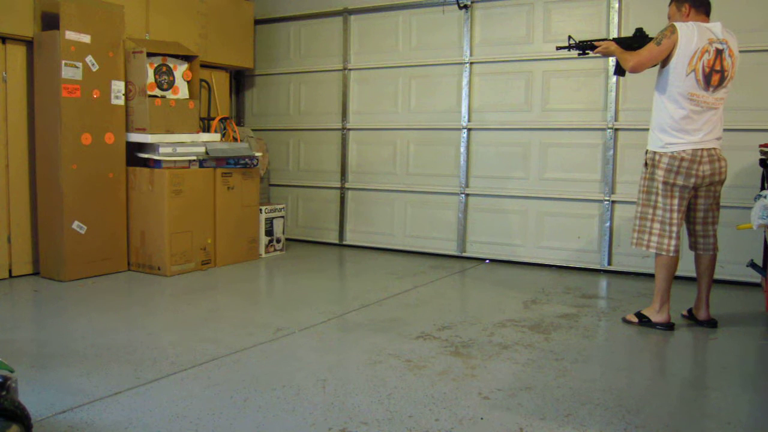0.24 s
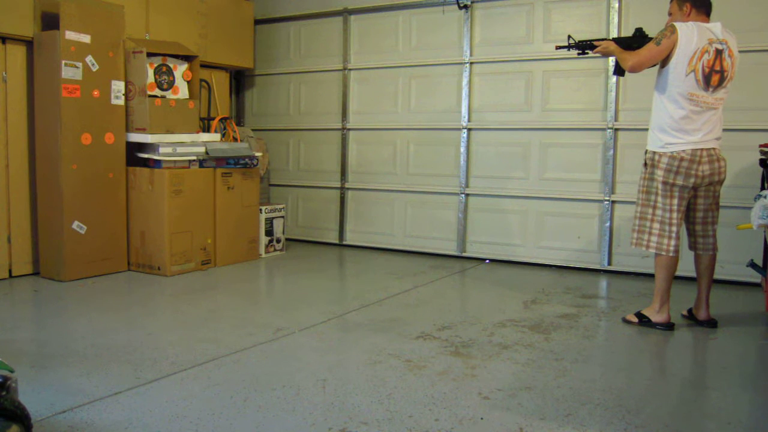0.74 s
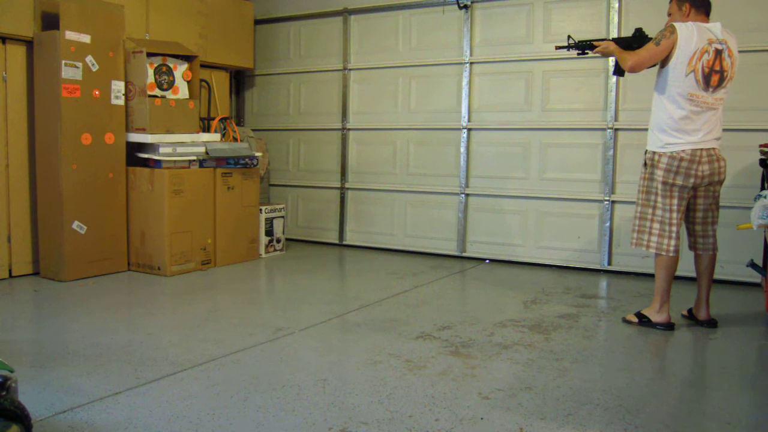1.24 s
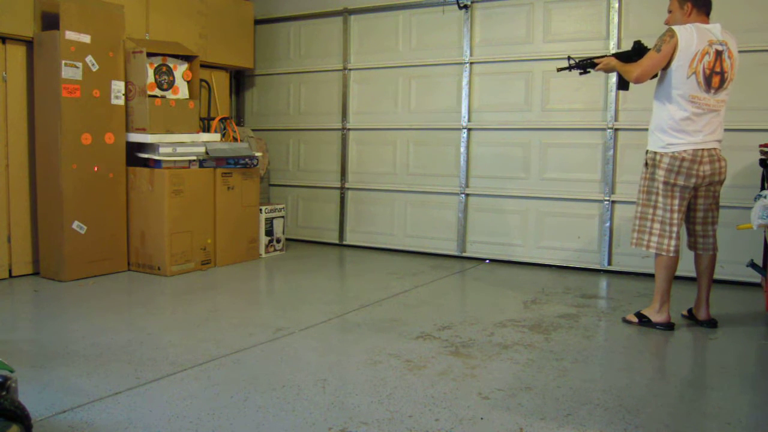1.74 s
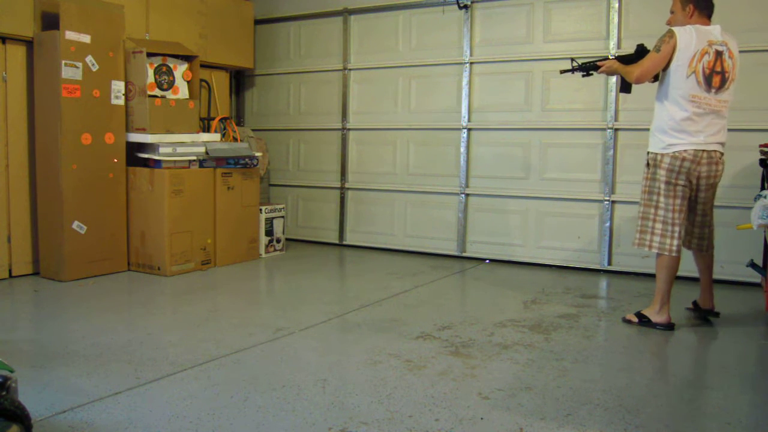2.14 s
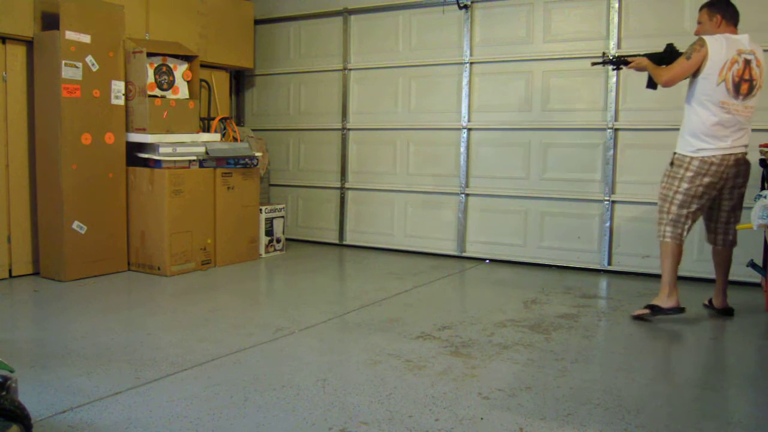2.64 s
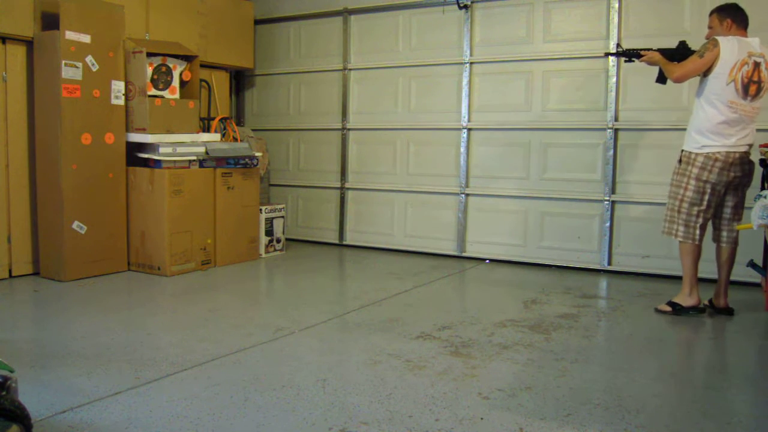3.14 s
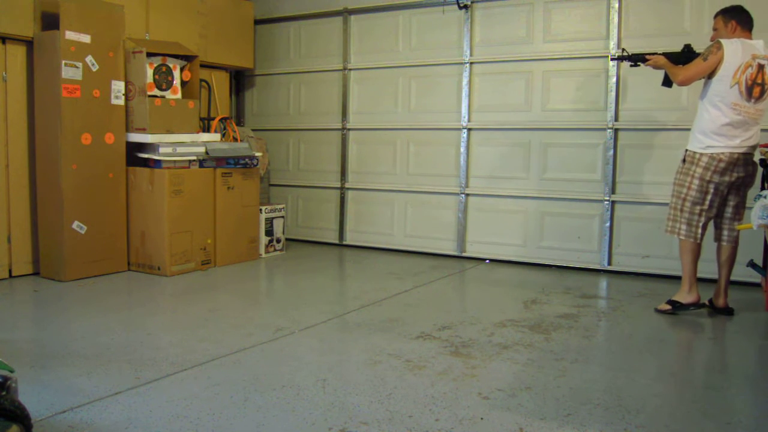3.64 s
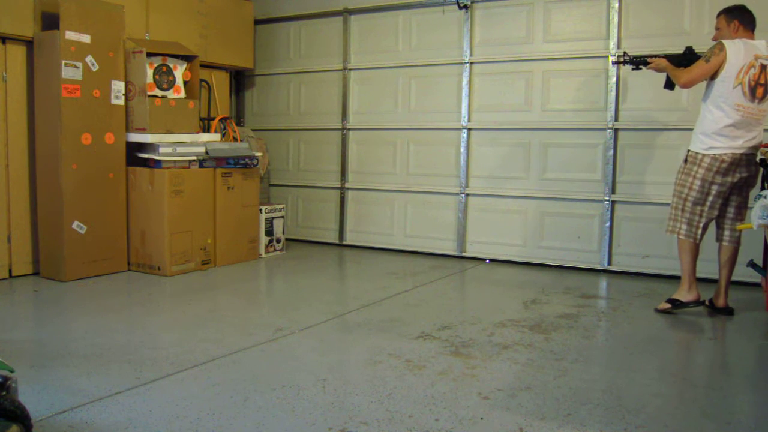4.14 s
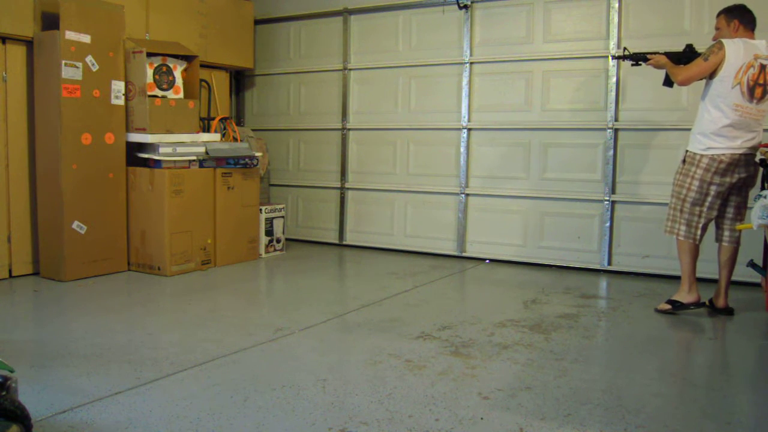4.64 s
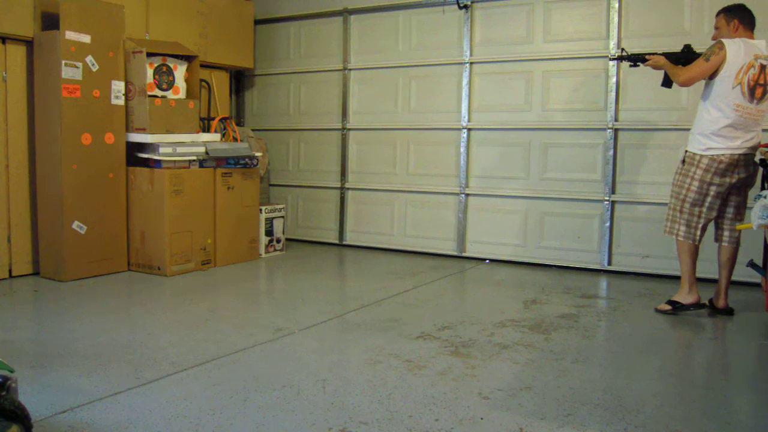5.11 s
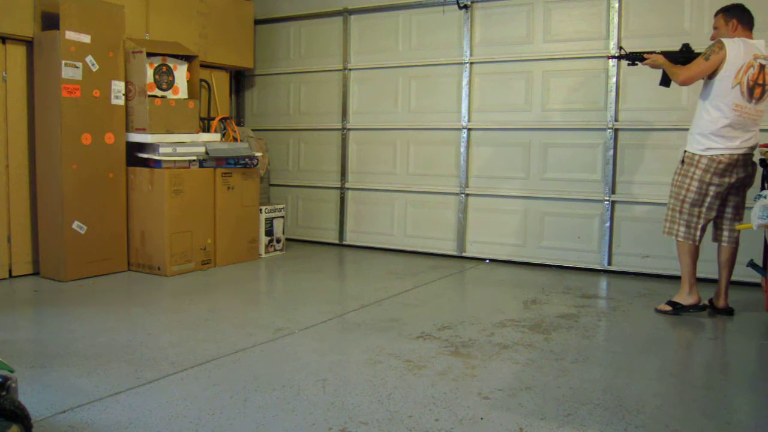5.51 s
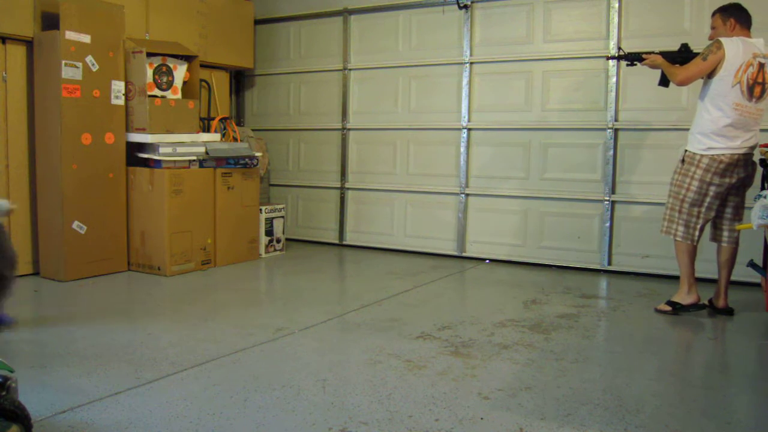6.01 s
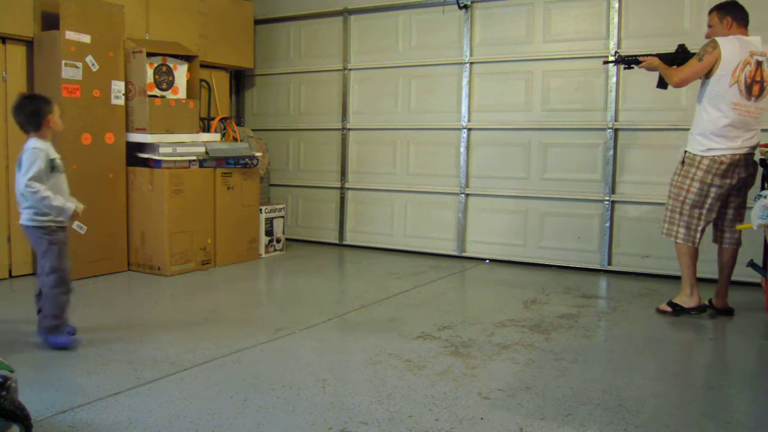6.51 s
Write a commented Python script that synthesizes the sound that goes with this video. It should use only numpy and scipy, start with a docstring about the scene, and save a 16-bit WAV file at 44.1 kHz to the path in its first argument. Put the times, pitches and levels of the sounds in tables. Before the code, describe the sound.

A sharp hiss of gas leads into a loud, rapid burst from an airsoft rifle, each shot a bright crack with a thump, while pellets slap hollow cardboard boxes. The action clatters dully for a second, then another hiss starts a second long burst that fades. Four short runs follow, mostly softer, with crisp ticks. The concrete garage rings briefly, and the loudest shots overload the microphone.

```python
"""Airsoft bursts in a bare garage

A rifle fires about twelve shots a second at a cardboard target: each a bright gas crack and a thump
of the action. Pellets slap the boxes; shots, clacks and impacts add sharp ticks. Gas hisses ahead of
the long bursts, the concrete room rings on, and the loudest bursts overload the microphone."""
import sys
import numpy as np
from scipy import signal
from scipy.fft import rfft, irfft
from scipy.io import wavfile

SR = 44100
rng = np.random.default_rng(int(sys.argv[2]) if len(sys.argv) > 2 else 0)


def wrap_up_sound(samples):
    """Save the sound to the file named by the first command line argument, as 16-bit audio."""
    columns = np.atleast_2d(samples).T
    # keep every value between -1 and 1, then stretch to whole-number steps
    tamed = np.clip(columns, -1, 1)
    steps = np.round(tamed * 32767).astype(np.int16)
    wavfile.write(sys.argv[1], SR, steps)


N = 298447
TIME_S = np.arange(N) / SR

# rushes of hiss: escaping gas, and one soft scuff near 6.4 s
# (start [s], end [s], rise [s], hiss [dB], drive of the hollow [dB])
HISS_RUSHES = [(0, 0.477, 0.00086, -41.5, -59), (0.464, 0.558, 0.037, -10.5, -18),
               (2.696, 2.776, 0.051, -13.5, -22.5), (4.349, 4.415, 0.058, -20, -32.5),
               (5.372, 5.406, 0.025, -34.5, -50), (6.36, 6.425, 0.024, -41, -70)]


def firing(spin_up=0.28, fade_power=1.14):
    """Per pull, rows (time [s], crack [dB], thump [dB]): the action speeds up while the cracks fade."""
    # trigger pulls: (first shot [s], last shot [s], shots, spin-up loss [s], first crack [dB],
    # total fade [dB], thump re crack [dB])
    bursts = [(.568, 1.326, 10, 0.019, 4, 10, -14), (1.372, 1.439, 2, 0, -11.5, 0, -12.5),
              (2.767, 3.797, 13, 0.017, 0, 17, -16.5), (4.426, 4.774, 5, 0.01, -3.5, 7, -17.5),
              (5.410, 5.684, 4, .025, -13.5, 5, -17.5), (5.928, 6.202, 4, 0.034, -19, 1, -17.5),
              (6.551, 6.740, 3, 0.014, -21, .4, -20)]
    pulls = []
    for first_s, last_s, count, lost_s, first_db, fade_db, thump_db in bursts:
        k = np.arange(round(count))
        progress = k / k[-1]
        late_s = lost_s * (1 - spin_up ** k)
        times_s = first_s + late_s + progress * (last_s - first_s - late_s[-1])
        crack_db = first_db - fade_db * progress ** fade_power
        pulls.append(np.column_stack([times_s, crack_db, crack_db + thump_db]))
    return pulls


def shots():
    """Gas cracks out of the muzzle while the action thumps the hollow body."""
    # spectra: (frequency [Hz], gain [dB])
    crack_eq = [(150, -29), (700, -12.5), (1500, -19.5), (3000, -14), (4300, -4), (6200, -5.5), (7700, 1),
                (9400, 0), (10300, -5), (11000, -16), (12200, -6.5)]
    thump_eq = [(30, -2.5), (60, -14.5), (120, -3.5), (220, -3), (350, -2.5), (600, -4.5), (1000, -0.5),
                (1500, -0.5), (3000, -2.5), (8000, -7.5)]
    # rifle body resonances, and a room mode near 354 Hz: (frequency [Hz], width [Hz], boost [dB])
    body_modes = [(216, 31, 6.5), (353.7, 11, 14), (844, 63, 6)]
    times_s, crack_db, thump_db = np.vstack(firing()).T
    crack = blows(times_s, crack_db, snap_s=0.00072, tail_s=0.018, tail_db=-27.5, rise_s=0.0026)
    thump = blows(times_s, thump_db, snap_s=0.0031, tail_s=0.032, tail_db=-11.5)
    return (colour(garage(crack, diffuse_db=1.5), crack_eq)
            + colour(garage(thump, diffuse_db=2.5), thump_eq, body_modes))


def landings():
    """Rows (time [s], slap [dB], boom [dB]): a pellet lands one flight time after its shot."""
    # hits per pull: (count, flight [s], first slap [dB], fade per hit [dB], boom re slap [dB])
    volleys = [(10, .039, -3.5, 1.1, -5), (1, .075, -17.5, 0, -4.5), (12, .040, -12, 2.5, -8),
               (3, 0.033, -7.5, 0.7, -20), (4, .036, -22.5, 1.7, -17.5), (3, 0.038, -38, 11, -5.5),
               (2, .032, -25.5, -1.5, -13.5)]
    hits = []
    for pull, (count, flight_s, first_db, fade_db, boom_db) in zip(firing(), volleys):
        for k, shot_s in enumerate(pull[:round(count), 0]):
            slap_db = first_db - fade_db * k
            hits.append((shot_s + flight_s, slap_db, slap_db + boom_db))
    return hits


def target():
    """Pellets slap the cardboard and the box booms behind it."""
    # square hits and rebounds: (time [s], slap [dB], boom [dB])
    hard_hits = [(1.623, -37, -36), (2.809, -13, -24), (2.905, -23, -20), (3.156, -25, -21.5),
                 (3.663, -24.5, -40.5)]
    # spectra: (frequency [Hz], gain [dB])
    slap_eq = [(100, -20.5), (400, -15.5), (800, -2), (1300, -1), (2200, 1.5), (3300, -2), (6000, -1),
               (9000, -2), (12000, -26.5)]
    boom_eq = [(30, -21), (70, -20.5), (140, -8.5), (230, -1.5), (330, -6), (550, 1.5), (1100, 0.5),
               (1500, -10.5), (2500, -29), (8000, -73)]
    # box cavity resonances, and the room mode near 355 Hz: (frequency [Hz], width [Hz], boost [dB])
    box_modes = [(237, 14.4, 0.5), (354.7, 11, 12), (292, 16, 4), (497, 28, 3.5), (595, 28, 0),
                 (648, 49, 1.5), (1161, 72, 3.5)]
    times_s, slap_db, boom_db = np.transpose(landings() + hard_hits)
    slap = blows(times_s, slap_db, snap_s=0.0046, tail_s=0.0071, tail_db=-25, rise_s=0.0021)
    boom = blows(times_s, boom_db, snap_s=0.009, tail_s=0.026, tail_db=-20.5)
    return (colour(garage(slap, diffuse_db=-1.5), slap_eq, box_modes)
            + colour(garage(boom, diffuse_db=1.5), boom_eq, box_modes))


def hisses(swell_power=1.46):
    """Gas jets and one soft scuff swell, hold and stop; the strong jets lead into a burst."""
    # hiss spectrum: (frequency [Hz], gain [dB])
    hiss_eq = [(100, -48), (400, -13), (700, -13), (1300, -2.5), (2600, -6), (4300, -2.5), (6200, 0.5),
               (8000, 0.5), (9500, 0), (11000, -10.5), (12200, -16)]
    swell = sum(undb(db) * np.clip((TIME_S - start_s) / rise_s, 0, 1) ** swell_power * (TIME_S < end_s)
                for start_s, end_s, rise_s, db, _ in HISS_RUSHES)
    return colour(garage(swell * rng.standard_normal(N), diffuse_db=3), hiss_eq)


def weak_cycles(spit_db=-7.5):
    """The action clatters dully with only a small spit of gas."""
    # weak cycles: (time [s], clack [dB])
    cycles = [(.114, -48), (.228, -51), (1.764, -38.5), (1.879, -37), (1.974, -31), (2.084, -35),
              (2.166, -33.5), (2.250, -31.5), (2.331, -33), (2.417, -29), (2.516, -29), (2.611, -27.5),
              (4.275, -44.5), (4.340, -39.5), (6.529, -43)]
    # spectra: (frequency [Hz], gain [dB])
    clack_eq = [(60, -19), (200, -11), (450, -3.5), (900, 1.5), (1500, -0.5), (2400, -4.5), (3500, -18),
                (7000, -14), (12000, -47)]
    spit_eq = [(100, -31), (500, -38), (1300, -12), (3200, -2), (4600, -2), (6200, 1.5), (8000, -2),
               (9800, -6), (11000, -17), (12200, -23)]
    times_s, clack_db = np.transpose(cycles)
    clack = blows(times_s, clack_db, snap_s=0.0082, tail_s=0.12, tail_db=-13)
    spit = blows(times_s, clack_db + spit_db, snap_s=0.003, tail_s=0.065, tail_db=-11, rise_s=0.002)
    return colour(garage(clack, diffuse_db=9), clack_eq) + colour(garage(spit, diffuse_db=-1.5), spit_eq)


def hollow(knock_db=-37, follow=0.3, whistle_hz=912, whistle_db=-25, hiss_db=-6):
    """The rifle's hollow whistles early in each rush and is knocked by each shot of a burst."""
    # cavity spectrum: (frequency [Hz], gain [dB])
    cavity_eq = [(300, -36), (720, -26), (850, -12), (915, -8.5), (1000, -23.5), (1170, -17), (3000, -61)]
    # its sharp resonance: (frequency [Hz], width [Hz], boost [dB])
    cavity_modes = [(900, 35, 4)]
    delay_s, width_s = 0.031, 0.017
    times_s, crack_db, _ = np.vstack(firing()).T
    levels_db = knock_db + follow * crack_db
    knocks = blows(times_s, levels_db, snap_s=0.011, tail_s=0.03, tail_db=-5, rise_s=0.0042)
    puffs = sum(undb(db) * np.exp(-((TIME_S - start_s - delay_s) / width_s) ** 2)
                for start_s, *_, db in HISS_RUSHES)
    whistle = undb(whistle_db) * np.sin(2 * np.pi * whistle_hz * TIME_S)
    hiss = undb(hiss_db) * rng.standard_normal(N)
    return colour(garage(puffs * (whistle + hiss) + knocks, diffuse_db=1), cavity_eq, cavity_modes)


def ticks():
    """Short, bright ticks: sharp edges of shots and action clacks, and pellet impacts."""
    # ticks: (time [s], level [dB])
    tick_events = [(1.98, -45), (2.418, -35), (2.613, -35.5), (3.748, -25), (4.274, -55), (5.081, -26.5),
                   (5.084, -25.5), (5.267, -38), (5.636, -24), (5.686, -23), (6.202, -23.5), (6.583, -20.5),
                   (6.683, -20.5)]
    # tick spectrum: (frequency [Hz], gain [dB])
    tick_eq = [(300, -26), (1200, -17), (3500, -15), (6000, -8), (8200, -3), (9800, -5.5), (11000, -15),
               (12200, -13.5)]
    times_s, levels_db = np.transpose(tick_events)
    snaps = blows(times_s, levels_db, snap_s=0.00046, tail_s=0.0034, tail_db=-45)
    return colour(garage(snaps, diffuse_db=-1), tick_eq)


def garage(x, diffuse_db, build_s=0.011, size=65536):
    """Direct sound, hard reflections, then a diffuse ring: noise fed by the source's power."""
    # floor, door and wall reflections: (delay [s], level re direct [dB])
    echoes = [(.0022, 4.5), (.0072, -3), (0.0134, 2.5), (0.0208, -5), (.0325, -7), (.039, -1)]
    # room decay; air and walls absorb treble sooner: (frequency [Hz], T60 [s])
    decays = [(100, 0.39), (400, 0.53), (1000, 0.57), (3000, 0.55), (6000, 0.45), (11000, 0.29)]
    early = x.copy()
    for delay_s, db in echoes:
        lag = int(delay_s * SR)
        early[lag:] += undb(db) * x[:N - lag]
    early /= np.sqrt(1 + sum(undb(db) ** 2 for _, db in echoes))
    arriving = leak(x ** 2, build_s)
    hz = np.fft.rfftfreq(size, 1 / SR)
    noise = rfft(rng.standard_normal(size))
    ring = 0
    for band_hz, t60_s in decays:
        share = on_log_axis(hz, [(f, f == band_hz) for f, _ in decays])
        band = np.resize(irfft(noise * share), N)
        ring += band * np.sqrt(leak(arriving, t60_s / np.log(1e6)))
    return (early + undb(diffuse_db) * ring) / np.hypot(1, undb(diffuse_db))


def rumble(end_s=0.65, level_db=-49):
    """A faint low rumble that ends under the first burst."""
    # rumble spectrum: (frequency [Hz], gain [dB])
    rumble_eq = [(40, -13), (100, -6), (200, -4.5), (420, -4), (700, -4.5), (1500, -27)]
    return undb(level_db) * colour((TIME_S < end_s) * rng.standard_normal(N), rumble_eq)


def room_noise(level_db=-50.5):
    """Faint, steady noise of the room."""
    # noise spectrum: (frequency [Hz], gain [dB])
    air_eq = [(15, -32), (25, -3), (262, -14.5), (555, -9.5), (2020, -13), (2680, -11), (8150, -19.5),
              (12000, -31), (15600, -69.5), (22000, -120)]
    return undb(level_db) * colour(rng.standard_normal(N), air_eq)


def blows(times_s, levels_db, snap_s, tail_s, tail_db, rise_s=0.00036, size=6000):
    """A noise snap and a weaker rattling tail at each time; levels are rms over 50 ms."""
    t = np.arange(size) / SR
    decay = np.exp(-t / snap_s) + undb(tail_db) * np.exp(-t / tail_s)
    attack = 1 - np.exp(-t / rise_s)
    snaps = rng.standard_normal((len(times_s), size)) * decay * attack
    out = np.zeros(N + size)
    for start_s, db, snap in zip(times_s, levels_db, snaps):
        i = int(start_s * SR)
        out[i:i + size] += snap * undb(db) * np.sqrt(SR / 20) / np.linalg.norm(snap)
    return out[:N]


def colour(x, points, modes=(), size=8192):
    """Minimum-phase, unit-energy filter from a spectrum and resonances."""
    hz = np.arange(size // 2 + 1) * SR / size
    gain = undb(on_log_axis(hz, points))
    for centre_hz, width_hz, db in modes:
        gain *= 1 + (undb(db) - 1) / (1 + (2 * (hz - centre_hz) / width_hz) ** 2)
    cepstrum = irfft(np.log(gain))
    cepstrum[1:size // 2] *= 2
    cepstrum[size // 2 + 1:] = 0
    response = irfft(np.exp(rfft(cepstrum)))
    return signal.fftconvolve(x, response / np.linalg.norm(response))[:N]


def leak(power, decay_s):
    """Stored energy leaking away exponentially."""
    keep = np.exp(-1 / (decay_s * SR))
    return signal.lfilter([1 - keep], [1, -keep], power + 1e-18)


def on_log_axis(hz, points):
    """Interpolate (frequency [Hz], value) points over log frequency."""
    points_hz, values = np.transpose(points)
    return np.interp(np.log(np.maximum(hz, 1)), np.log(points_hz), values)


def undb(db):
    """Decibels to gain."""
    return 10 ** (np.asarray(db) / 20)


def scene():
    """Rifle, target and pellets in the garage, over room noise; mono."""
    return (room_noise() + shots() + weak_cycles() + hisses() + hollow() + target()
            + ticks() + rumble())[None]


def record(dry):
    """The microphone input clips hard; the top is then rolled off and cut."""
    clip_level, rolloff_hz, cutoff_hz = 0.48, 11000, 12200
    oversampled = signal.resample_poly(dry, 2, 1, axis=1)
    clipped = signal.resample_poly(np.clip(oversampled, -clip_level, clip_level), 1, 2, axis=1)
    rolled = signal.sosfiltfilt(signal.butter(6, rolloff_hz, fs=SR, output="sos"), clipped)
    steep_fir = signal.firwin(301, cutoff_hz, window=("kaiser", 7), fs=SR)
    return signal.fftconvolve(rolled, steep_fir[None], mode="same")


dry = scene()
out = record(dry)
wrap_up_sound(out)
```